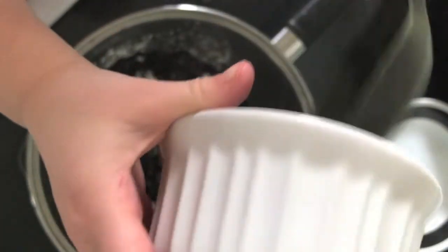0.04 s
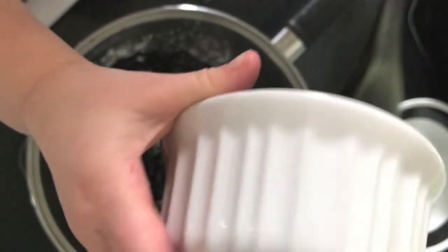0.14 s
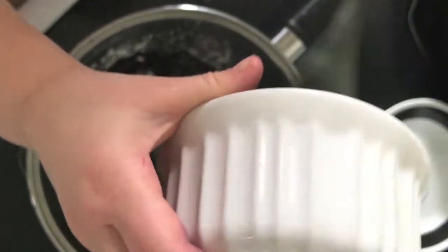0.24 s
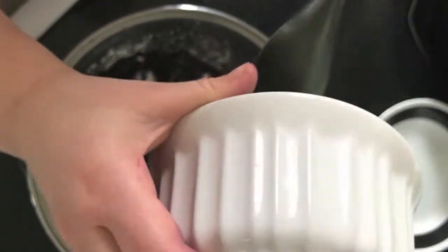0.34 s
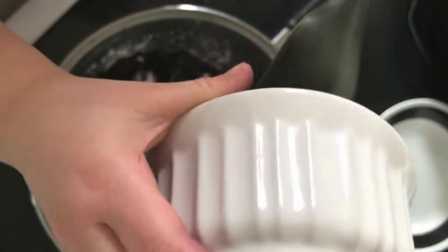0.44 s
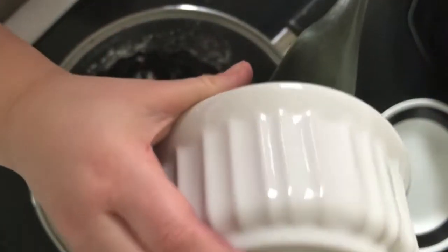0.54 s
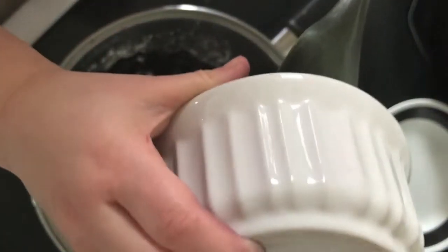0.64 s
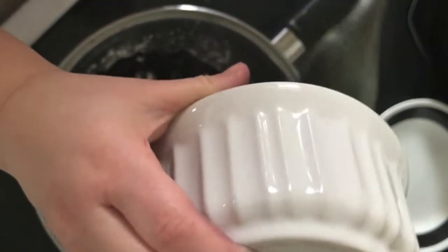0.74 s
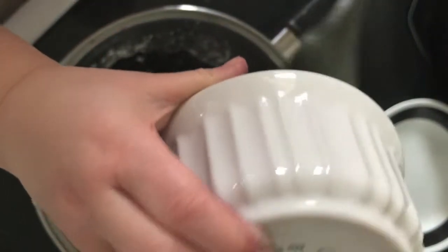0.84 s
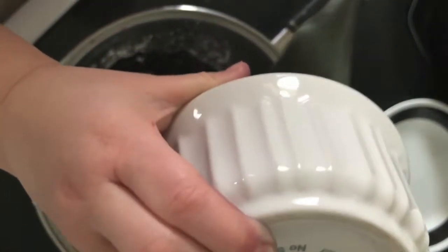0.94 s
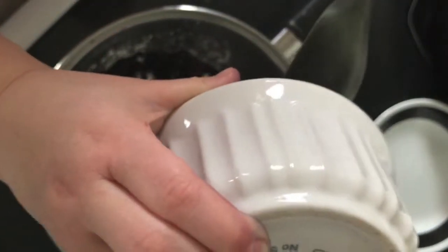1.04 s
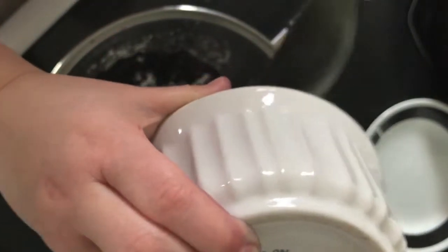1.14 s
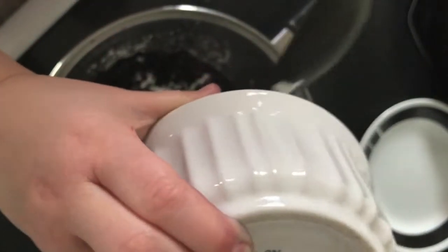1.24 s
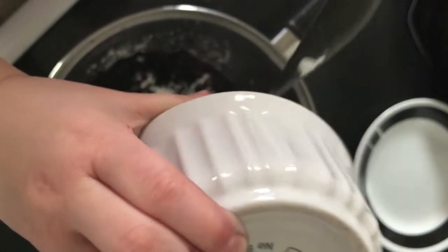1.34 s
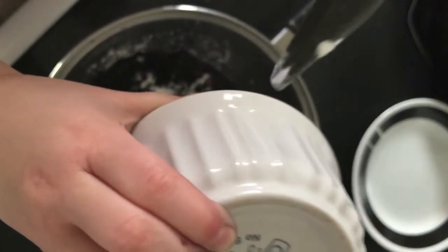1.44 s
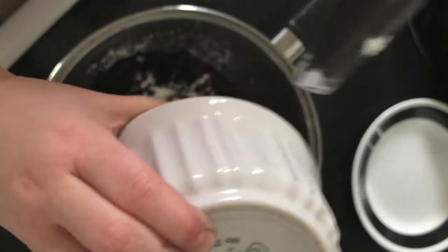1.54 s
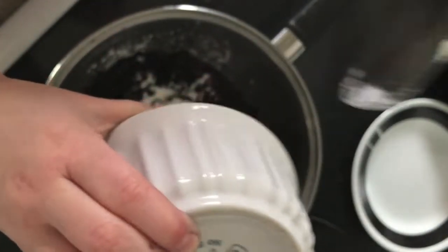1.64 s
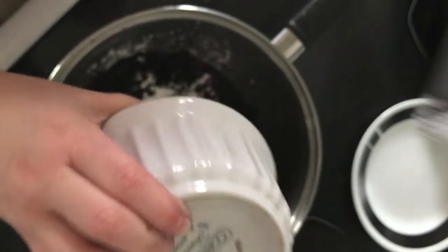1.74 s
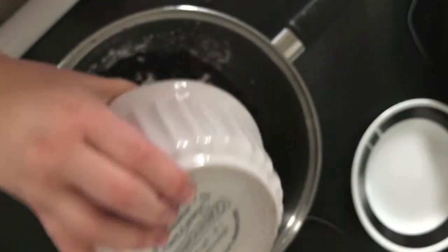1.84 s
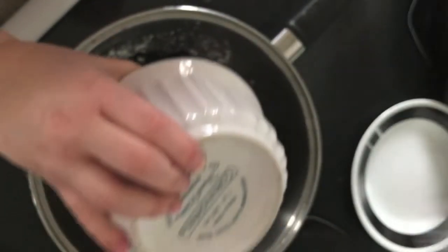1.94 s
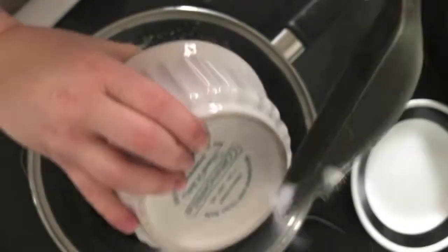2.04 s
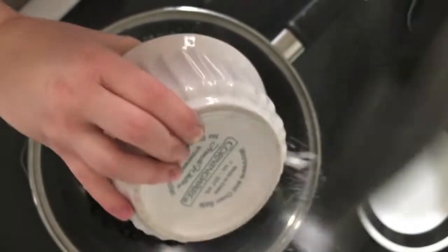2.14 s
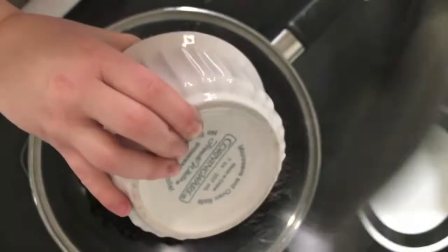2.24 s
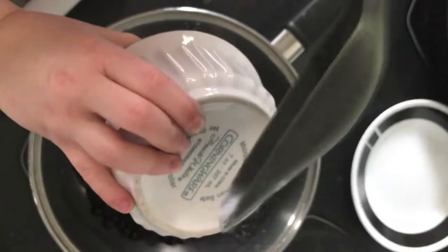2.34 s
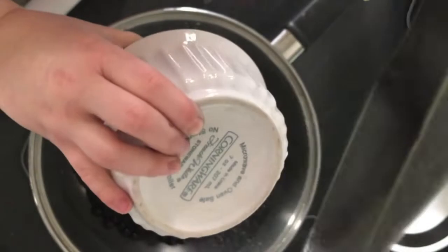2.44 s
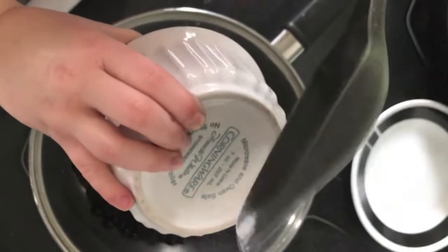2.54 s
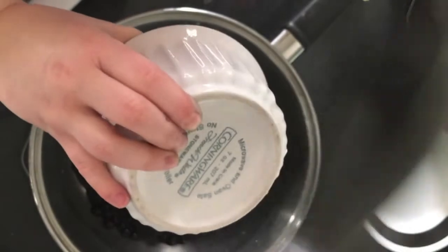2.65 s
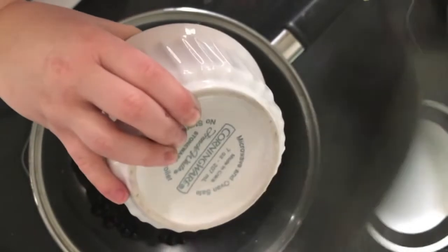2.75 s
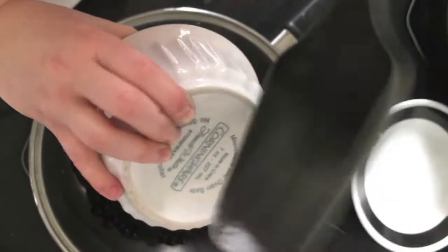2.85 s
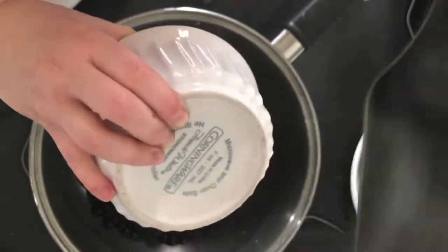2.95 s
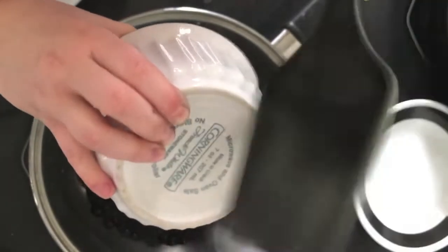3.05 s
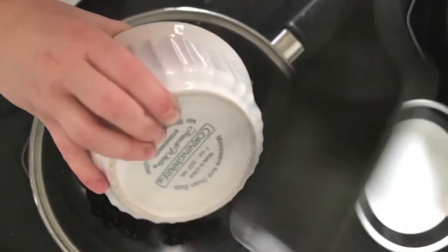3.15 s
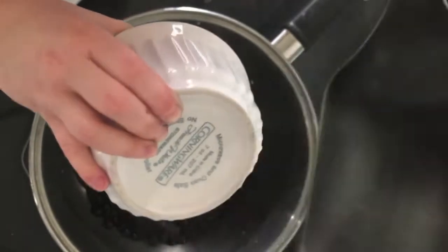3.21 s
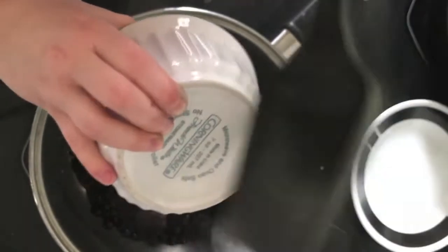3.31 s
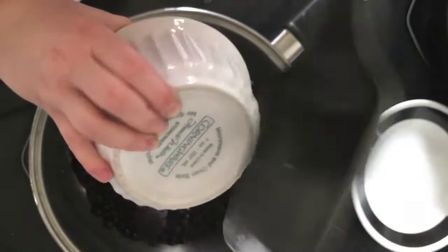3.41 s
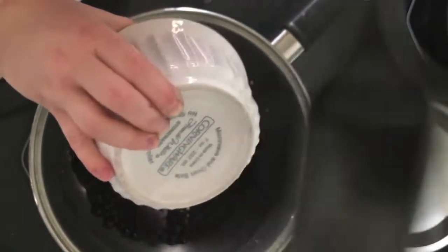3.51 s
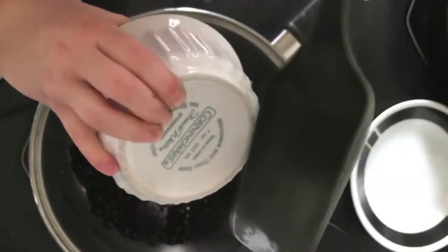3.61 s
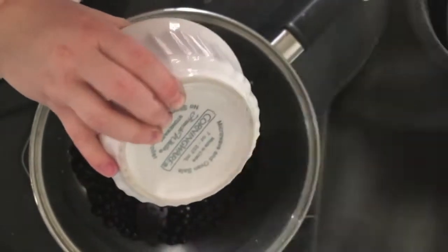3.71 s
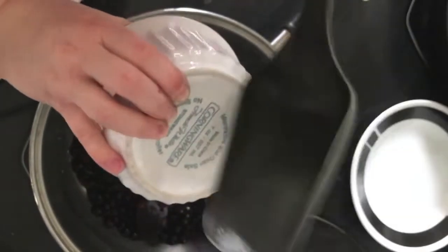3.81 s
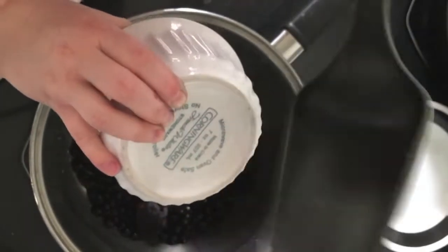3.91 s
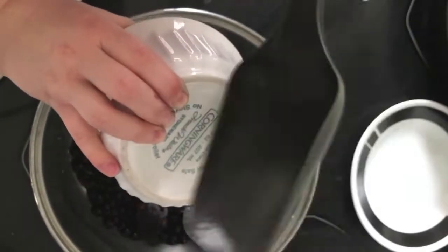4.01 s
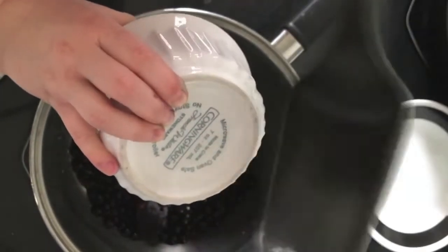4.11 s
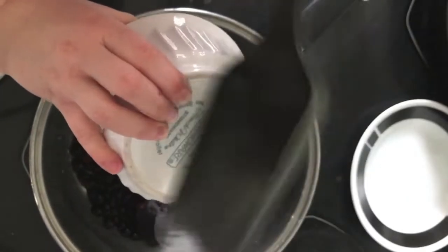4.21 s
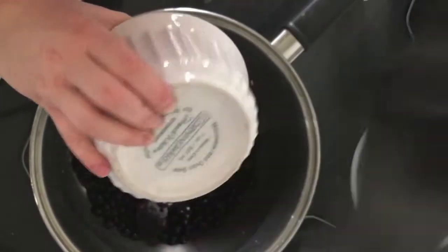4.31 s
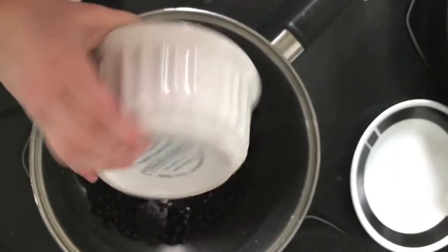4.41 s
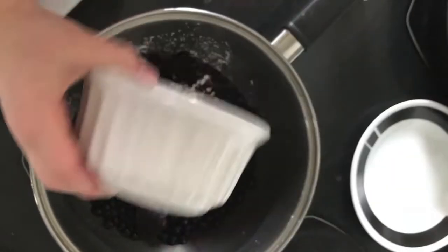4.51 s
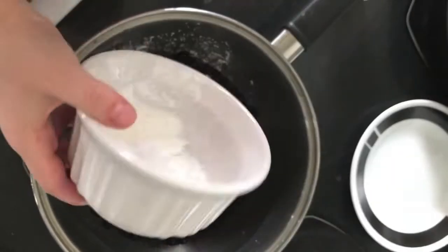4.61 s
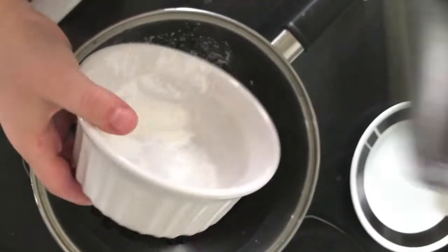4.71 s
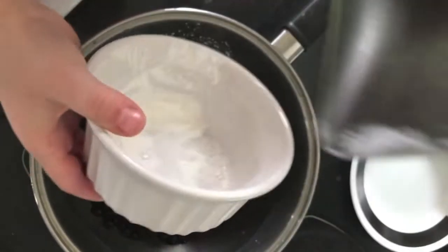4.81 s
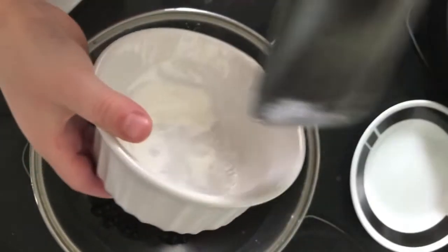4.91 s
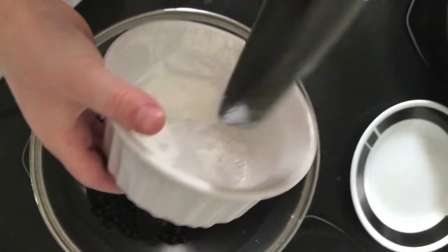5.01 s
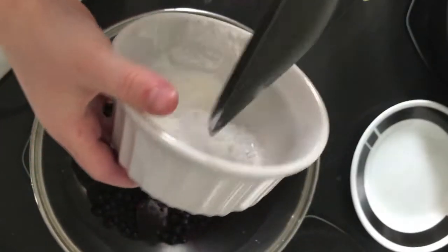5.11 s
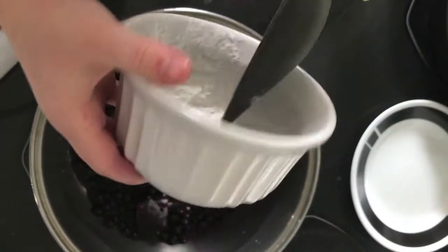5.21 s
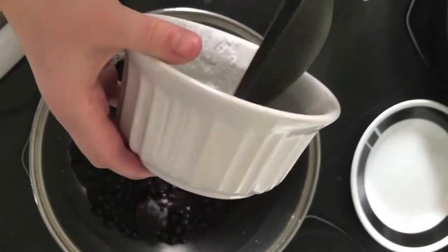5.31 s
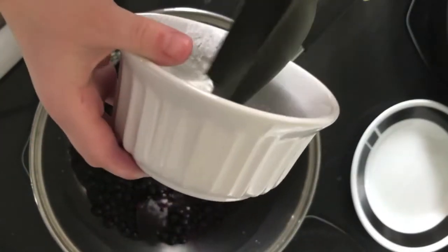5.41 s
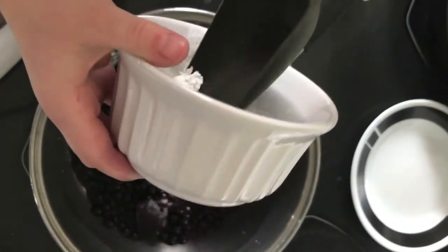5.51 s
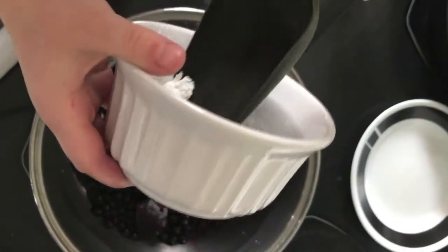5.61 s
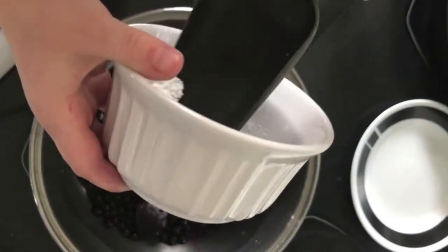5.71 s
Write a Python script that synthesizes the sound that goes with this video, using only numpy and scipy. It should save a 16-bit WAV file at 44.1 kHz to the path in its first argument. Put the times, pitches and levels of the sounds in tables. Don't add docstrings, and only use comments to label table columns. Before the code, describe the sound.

A hand-held ceramic bowl is rapped sharply, first with a long pause, then in a quick irregular run, over faint low motor hum.

```python
import sys
import numpy as np
from scipy import signal
from scipy.fft import rfft, irfft, next_fast_len
from scipy.io import wavfile
from scipy.ndimage import uniform_filter1d

SR = 44100
rng = np.random.default_rng(int(sys.argv[2]) if len(sys.argv) > 2 else 0)


def transcribe(u):
    v = np.clip(np.atleast_2d(u).T, -1, 1)
    q = np.round(v * 32767).astype(np.int16)
    wavfile.write(sys.argv[1], SR, q)


def volts_from_db(level):
    exponent = np.asarray(level, float) / 20
    return 10 ** exponent


N = 254085


def rms_one(x):
    return x / np.sqrt(np.mean(x ** 2) + 1e-20)


def in_time(rows):
    return np.interp(np.arange(N) / SR, *np.transpose(rows))


def at_hz(points, hz):
    table_hz, values = np.array(points).T
    return np.interp(np.log(hz + 1), np.log(table_hz), values)


def bandpass(x, low_hz, high_hz):
    return signal.sosfilt(signal.butter(2, [low_hz, high_hz], "band", fs=SR, output="sos"), x)


def drift(rate_hz):
    r = np.exp(-2 * np.pi * rate_hz * 40 / SR)
    slow = signal.lfilter([1], [1, -2 * r, r * r], rng.standard_normal(N // 40 + 2002))[2000:]
    return np.interp(np.arange(N) / 40, np.arange(len(slow)), rms_one(slow))


def add(out, s, sound):
    at = round(s * SR)
    out[at:at + len(sound)] += sound[:N - at]


def modes(hz, db, t60, phase, length):
    t = np.arange(length)[:, None] / SR
    return (volts_from_db(db - 60 * t / t60) * np.sin(2 * np.pi * hz * t + phase)).sum(axis=1)


# f/Hz, level/dB per Hz
AIR_COLOUR = [(18, -34.5), (30, -18), (73, -9.5), (138, -5), (245, -1.5), (355, -15), (437, -14.5),
              (512, -20), (937, -21), (1590, -29.5), (1910, -30), (11700, -34.5), (15600, -40),
              (16300, -52.5)]
# f/Hz, level/dB rms
MAINS_LINES = [(59.3, -42.5), (296.1, -50)]
# f/Hz, level/dB rms
BUZZ_LINES = [(839.8, -72.5), (958.2, -70), (1319, -70.5), (1561, -79), (2159, -79), (2875, -81),
              (3833, -74.5)]
# t/s, level/dB
BUZZ_LEVEL = [
    (0, 0),
    (4.6, -8),
    (4.8, 9),
    (5.2, 4.5),
    (5.76, -21),
]
# order (multiples of the shaft turning), level/dB
FAN_TONES = [(1.882, -56), (3.001, -48.5), (3.651, -58.5), (4, -48), (4.5, -53), (5, -42), (6, -55.5)]
FAN_HZ, AIR_DB = 48.15, -43


def hum():
    t = np.arange(N) / SR

    def line(hz, db):
        return volts_from_db(db + 3) * np.sin(2 * np.pi * (hz * t + rng.random()))

    out = sum(line(hz, db) for hz, db in MAINS_LINES)
    out += volts_from_db(in_time(BUZZ_LEVEL)) * sum(line(hz, db) for hz, db in BUZZ_LINES)
    shaft_angle = 2 * np.pi * np.cumsum(FAN_HZ * (1 + 0.0057 * drift(5.7))) / SR
    out += sum(volts_from_db(db + 1.5 + 3.12 * drift(4.1)) * np.sin(order * shaft_angle) for order, db in FAN_TONES)
    size = next_fast_len(N)
    colour = volts_from_db(at_hz(AIR_COLOUR, np.fft.rfftfreq(size, 1 / SR)))
    air = irfft(rfft(rng.standard_normal(size)) * colour, size)[:N]
    return out + volts_from_db(AIR_DB) * rms_one(air)


# f/Hz, t60/s
ROOM_DECAY = [(200, 0.29), (1000, 0.32), (3000, 0.35), (6000, 0.27), (10000, 0.11), (15000, 0.23)]


def kitchen(x):
    t, edges = np.arange(SR // 2) / SR, np.geomspace(150, 17000, 11)
    tail = 0
    for low, high in zip(edges, edges[1:]):
        band = bandpass(rng.standard_normal(len(t)), low, high)
        tilt_db = 0.52 * np.log2(low / 2000)
        tail = tail + band * volts_from_db(tilt_db - 60 * t / at_hz(ROOM_DECAY, np.sqrt(low * high)))
    tail = tail * np.clip(t / 0.019, 0, 1) ** 2
    return signal.fftconvolve(x, tail / np.sqrt(np.sum(tail ** 2)))[:N]


# middle t/s, length t/s, level/dB
FINGER_SHIFTS = [
    (0.106, .15, -54.5),
    (.35, .25, -52.5),
    (1.0, .2, -55.5),
    (4.503, 0.059, -64.5),
    (5.4, 0.26, -60.5),
    (5.76, .1, -57),
]
RESTING_DB, POWDER_DB = -64, -4


def rustle():
    t = np.arange(N) / SR
    shifts = sum(volts_from_db(db) * np.exp(-((t - s) / length) ** 2) for s, length, db in FINGER_SHIFTS)
    grains = rng.standard_normal(N) * volts_from_db(1.3 * drift(40.))
    coarse = rms_one(bandpass(grains, 1400, 4800))
    powder = rms_one(bandpass(grains, 5500, 16000))
    return (volts_from_db(RESTING_DB) + shifts) * (coarse + volts_from_db(POWDER_DB) * powder)


# f/Hz, level/dB, t60/s
LINGERING_MODES = [(487, -44, 0.35), (559, -34.5, 0.16), (935, -39.5, 0.29), (1017, -43, 0.2),
                   (1085, -37, 0.35), (1162, -34, 0.4)]
# t/s, f/Hz, level/dB, t60/s
SINGLE_RINGS = [(0.328, 6490, -47.5, .15), (.5446, 2045, -26, .18), (.5446, 2290, -24.5, .16),
                (0.921, 2940, -60, 0.89), (0.93, 3110, -55, 0.98), (2.1164, 1227, -26, 0.21),
                (2.3838, 1224, -25, 0.16), (2.1175, 1940, -22.5, 0.32), (2.3833, 1990, -28.5, 0.29),
                (2.614, 1260, -34.5, .15), (5.2514, 3800, -27.5, 0.12), (5.2514, 4105, -28, 0.15)]
# f/Hz, level/dB, t60/s
RIM_BEAT = [(2739, -4, .31), (2743.8, -4, .31), (2741, -5, .1)]
# f/Hz, level/dB, t60/s
RIM_OTHERS = [(2150, -21.5, 0.1), (2370, -18, 0.047), (2340, -13.5, 0.1), (6570, -19.5, 0.089),
              (11200, -23.5, .1)]
# t/s, level/dB
RIM_STRIKES = [
    (0.2197, -26.5),
    (0.5446, -11.5),
    (2.1175, -18),
    (2.3833, -40),
    (3.1245, -28.5),
    (3.6778, -42.5),
    (3.8583, -38.5),
    (4.0839, -42),
    (4.2611, -35),
    (5.2514, -38.5),
]
# f/Hz, level/dB, t60/s
BASE_RESONANCES = [(1160, -17.5, 0.17), (1425, -14, 0.18), (1790, -6, 0.14), (1824, -0.5, 0.071),
                   (1990, -5, 0.069), (2148, -7, 0.1), (3160, -17.5, 0.21), (4060, -12.5, 0.13)]
# t/s, level/dB, tilt/dB per octave
BASE_STRIKES = [
    (0.3534, -31, -23.5),
    (2.1175, -11, 1),
    (2.3816, -18.5, -6),
    (2.616, -21, -4),
    (2.8708, -44, 10.5),
    (3.1257, -35, -9.5),
    (3.399, -31.5, 1),
    (3.6765, -39.5, 10),
    (5.2532, -33, 5),
]
RIM_CAUGHT_S = .17


def rings():
    out, length = np.zeros(N), SR // 2
    add(out, 0, modes(*np.transpose(LINGERING_MODES), 0, length))
    for s, hz, db, t60 in SINGLE_RINGS:
        add(out, s, modes(hz, db, t60, 0, length))
    hz, level_db, t60 = np.transpose(RIM_BEAT + RIM_OTHERS)
    caught = np.exp(-(np.arange(length) / SR / RIM_CAUGHT_S) ** 4)
    for s, db in RIM_STRIKES:
        add(out, s, modes(hz, level_db + db, t60, 0, length) * caught)
    hz, level_db, t60 = np.transpose(BASE_RESONANCES)
    phases = 0.89 * rng.standard_normal((len(BASE_STRIKES), len(hz)))
    for (s, db, tilt_db), phase in zip(BASE_STRIKES, phases):
        struck_db = level_db + db + tilt_db * np.log2(hz / 1900)
        add(out, s, modes(hz, struck_db, t60, phase, length))
    return out


# f/Hz, level/dB, t60/s
CAVITY_AND_HAND = [(370, -0.5, .025), (522, -1, .025), (288, 0, 0.005), (130, -11, .025)]


def thumps():
    out, (hz, level_db, t60) = np.zeros(N), np.transpose(CAVITY_AND_HAND)
    for (s, *_), (push_db, *_) in zip(FIRM_KNOCKS, DISH_ANSWERS):
        add(out, s, modes(hz, level_db + push_db, t60, 0, length=4000))
    return out


# f/Hz, level/dB
HELD_DISH = [(1200, 9), (1340, 0.5), (1510, -1.5), (1740, -1.5), (1940, 0.5), (2080, -11.5), (2210, 0),
             (2430, -2), (3000, -11), (3170, -1.5), (3340, -4.5), (3640, -2), (3980, 1.5), (4400, 3)]
# push on the hand level/dB, ring left level/dB, then three leading modes f/Hz
DISH_ANSWERS = [(-38, -2, 1528, 1357, 3700), (-39.5, 4.5, 1496, 1250, 1000),
                (-27.5, -1.5, 2056, 4371, 1000), (-30, 0.5, 1700, 1900, 1195),
                (-16, -0.5, 1937, 1100, 2700), (-14.5, -1.5, 2201, 1450, 3100), (-16, 0, 2200, 3143, 2400),
                (-16.5, 0, 2600, 3278, 1100), (-22, -3, 3294, 2800, 1500), (-17, -2.5, 3181, 2134, 2454),
                (-18.5, -3, 3380, 5900, 1500), (-13.5, -3.5, 2427, 3300, 6300), (-12, -3, 1900, 4700, 3147),
                (-28.5, -2.5, 3200, 2217, 1450), (-34, 1, 4000, 2290, 1520), (-30.5, -3, 6200, 2212, 4900),
                (-41, 4, 1324, 4700, 8800), (-20, -5.5, 3994, 3660, 3133)]
LEAD_DB, PITCH_T60_S = [-12, -15.5, -18], 0.023
HELD_DB, REACH_DB_PER_OCTAVE2, SPOT_SPREAD_DB = -17.5, 15, 2


def pitches():
    out, t = np.zeros(N), np.arange(4000) / SR
    hz, level_db = np.transpose(HELD_DISH)
    build_up = 1 - np.exp(-t / 0.00018)
    chances = rng.standard_normal((len(FIRM_KNOCKS), 2, len(hz)))
    for knock, answer, (level_luck, phase_luck) in zip(FIRM_KNOCKS, DISH_ANSWERS, chances):
        s, db, pitch_hz, *_ = knock
        _, ring_db, *lead_hz = answer
        reach_db = HELD_DB - REACH_DB_PER_OCTAVE2 * np.log2(hz / pitch_hz) ** 2 + SPOT_SPREAD_DB * level_luck
        ring = modes(hz, level_db + reach_db, PITCH_T60_S, 2 * phase_luck, length=len(t))
        ring += modes(np.array(lead_hz), np.array(LEAD_DB), PITCH_T60_S, 0, length=len(t))
        add(out, s, volts_from_db(db + ring_db) * ring * build_up)
    return out


BELOW_PITCH_DB_PER_OCTAVE, ABOVE_PITCH_DB = 9, -2
SOFTNESS_SHARE = 0.21


def clack_colour_db(db, pitch_hz, tick_db, hz):
    above_db = ABOVE_PITCH_DB + SOFTNESS_SHARE * tick_db
    return at_hz([(pitch_hz / 4, db + 0.5 - 2 * BELOW_PITCH_DB_PER_OCTAVE),
                  (pitch_hz, db - 4.5),
                  (1.6 * pitch_hz, db - 5.5 + above_db),
                  (9500, db + tick_db),
                  (16000, db + tick_db - 5.5)], hz)


# t/s, energy level/dB, pitch of the spot f/Hz, tick near 9 kHz relative level/dB, contact t/s
FIRM_KNOCKS = [(0.219, -4.5, 1700, -33.5, .0025), (0.3542, -5.5, 1310, -21, .005),
               (0.5447, 4, 2200, 0.5, .0055), (2.1159, 17.5, 2100, -9, .0084),
               (2.383, 5, 1680, -3.5, .0025), (2.614, 5, 1800, -5, .004), (2.869, 5, 2550, -1, .0036),
               (3.1246, 7, 2695, 2, .0054), (3.1525, 2, 2833, 0, .0022), (3.398, 9, 2800, -1.5, .007),
               (3.431, 4, 2700, -2, .003), (3.641, 11.5, 2877, -2.5, .005), (3.6774, 6.5, 2476, -3.5, .005),
               (3.8584, 6.5, 2840, 2, .0033), (4.0833, -1.5, 3060, 2.5, .0033),
               (4.2396, 5, 3280, -3, .0025), (4.2604, -6.5, 2160, -5, .0025), (5.2512, 7, 3700, 2, .005)]
# t/s, energy level/dB, pitch f/Hz, tick relative level/dB, contact t/s
LIGHT_TOUCHES = [(0.131, -20.5, 1500, -16, 0.0077), (0.2272, -13.5, 2200, -15.5, 0.0032),
                 (0.6623, -13, 2200, -35, .0025), (0.7978, -19.5, 2400, -16.5, .012),
                 (1.0385, -41, 3900, 20.5, .012), (2.0948, -16.5, 1800, -17.5, .015),
                 (2.6617, -12.5, 1500, -19, .003), (3.1705, -7, 3280, 0, 0.0016),
                 (3.4615, -7, 2600, -9, .0015), (4.2685, -3.5, 2300, -23, 0.0031),
                 (4.2904, -12.5, 2400, -5, 0.022), (4.4402, -12, 1300, -5.5, 0.035),
                 (5.229, -46.5, 4040, 21.5, 0.0043), (5.2696, -8.5, 2400, -8, 0.0029),
                 (5.3532, -8, 1380, -18.5, 0.0055)]


def clacks():
    out, edges, t = np.zeros(N), np.geomspace(500, 16200, 17), np.arange(4000) / SR
    blows = sorted(FIRM_KNOCKS + LIGHT_TOUCHES)
    contact = np.clip(np.array(blows)[:, 4:], .0007, .04)
    chatter, ringing = rng.standard_normal((len(blows), 2, 2, len(t))).transpose(1, 2, 0, 3)
    touch = 3.3 * np.minimum(1, .006 / contact.ravel())
    chatter[..., 2] = [touch, -touch]
    spikes = chatter * np.abs(chatter) ** .5
    sounds = 0
    for k, (low, high) in enumerate(zip(edges, edges[1:])):
        hz = np.sqrt(low * high)
        fading = t / (0.48 * contact) * (hz / 2500) ** 0.19
        force = spikes[k % 2] * np.exp(-fading - (t / (1.8 * contact)) ** 4)
        after = ringing[k % 2] * volts_from_db(-8.5 - 60 * t / (0.047 + 15.0 / hz))
        band = bandpass(force + after, low, high)
        band = band / np.sqrt(np.sum(band ** 2, axis=1, keepdims=True))
        colour_db = [clack_colour_db(db, pitch, tick, hz) for _, db, pitch, tick, _ in blows]
        sounds = sounds + volts_from_db(colour_db)[:, None] * band
    for (s, *_), sound in zip(blows, sounds):
        add(out, s, sound)
    return out


def scene():
    hits, long = clacks() + thumps(), rings()
    background, short = hum() + rustle(), pitches()
    echo = volts_from_db(-19.5) * kitchen(hits + 0.62 * short + 0.15 * long)
    return (hits + short + long + echo + background)[None]


GATE_LEAD_S, GATE_HOLD_S, FRESH_AFTER_S = .004, .408, .025
GATE_OPEN_DB, GATE_SHUT_DB = 2.5, -9
GATE_DULL_SHARE = 0.19


def gate_db():
    t, (s, _, _, tick_db, _) = np.arange(N) / SR, np.transpose(FIRM_KNOCKS)
    fresh = np.diff(s, prepend=0) > FRESH_AFTER_S
    opened = np.append(-1, s[fresh] - GATE_LEAD_S)
    dullness_db = np.minimum(np.append(0, tick_db[fresh]) + 9, 0)
    open_db = GATE_OPEN_DB + GATE_DULL_SHARE * dullness_db
    last = np.searchsorted(opened, t) - 1
    gain_db = np.where(t - opened[last] > GATE_HOLD_S, GATE_SHUT_DB, open_db[last])
    return uniform_filter1d(gain_db, size=250)


def band_limit(x):
    return signal.sosfilt(signal.butter(12, 16400, fs=SR, output="sos"), x)


def record(dry):
    dry = signal.sosfilt(signal.butter(4, 48, "high", fs=SR, output="sos"), dry)
    dry = dry - 0.29 * signal.lfilter(*signal.iirpeak(10500, 7., fs=SR), dry)
    bass = signal.filtfilt(*signal.butter(1, 2000, fs=SR), dry)
    gated = bass + volts_from_db(gate_db()) * (dry - bass)
    clipped = np.clip(gated, -1.03, 1.03)
    return band_limit(clipped)


dry = scene()
out = record(dry)
transcribe(out)
```